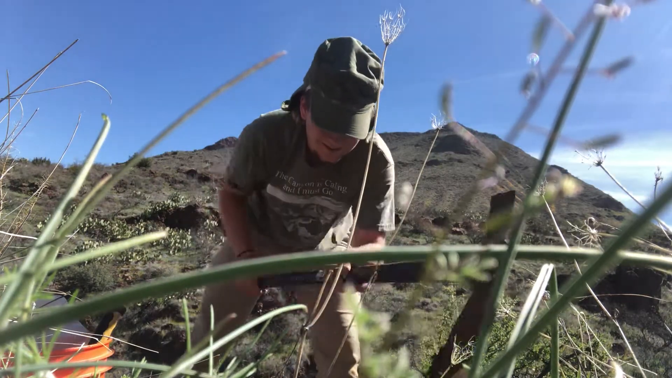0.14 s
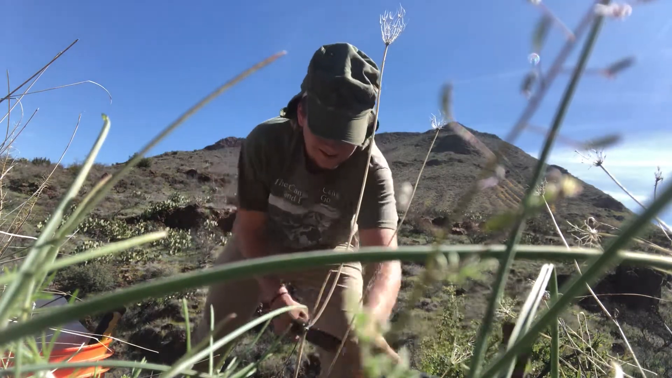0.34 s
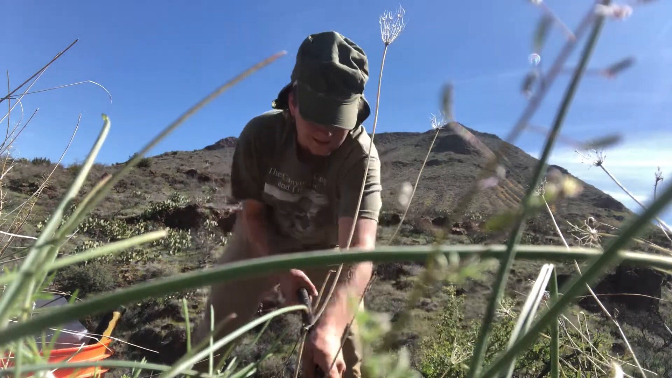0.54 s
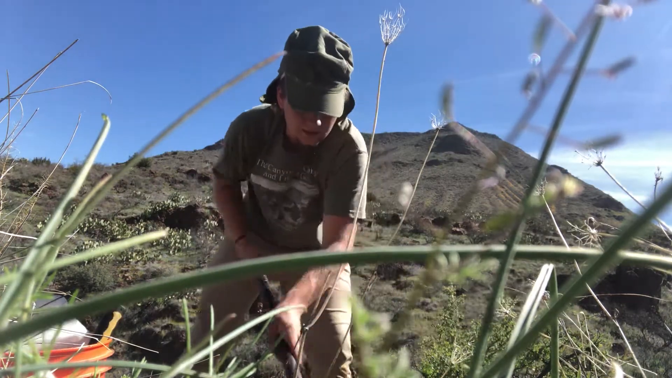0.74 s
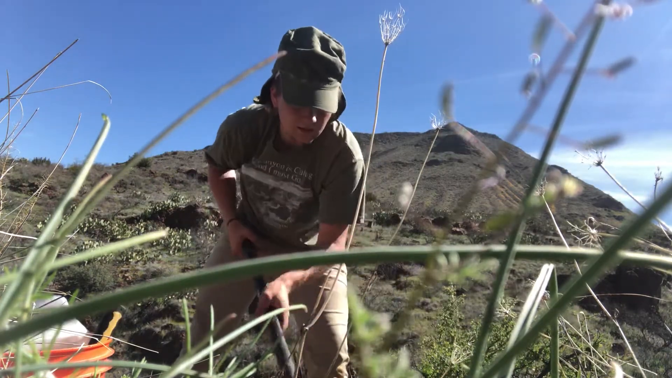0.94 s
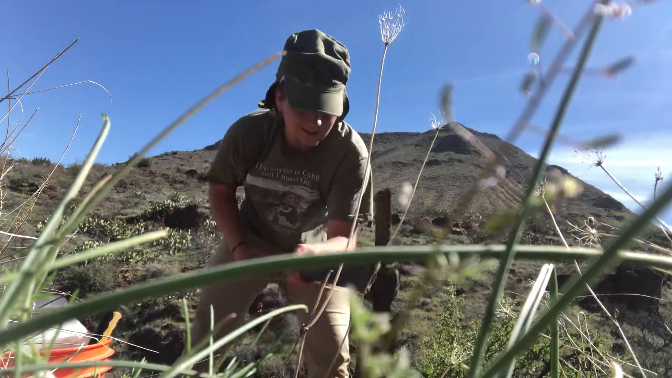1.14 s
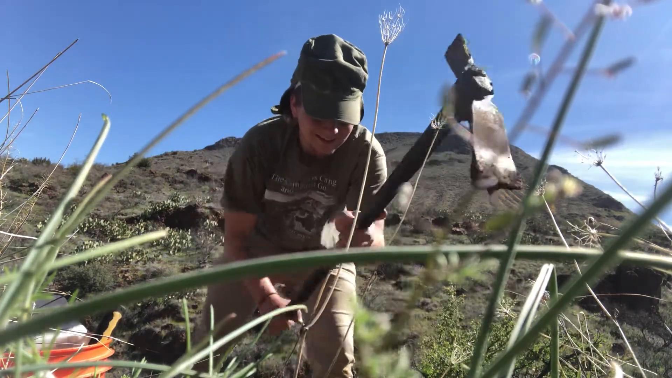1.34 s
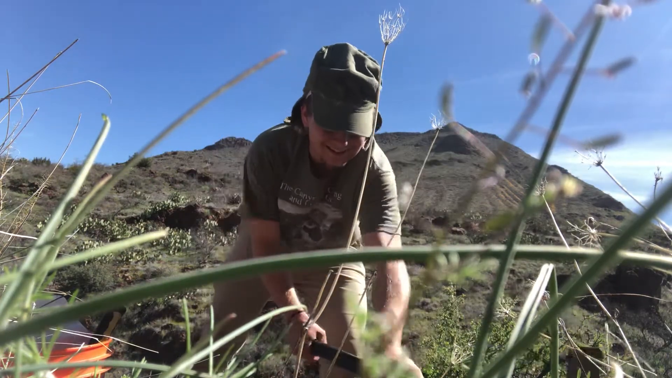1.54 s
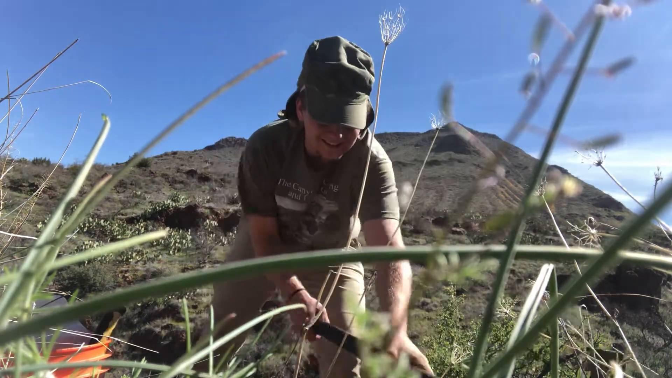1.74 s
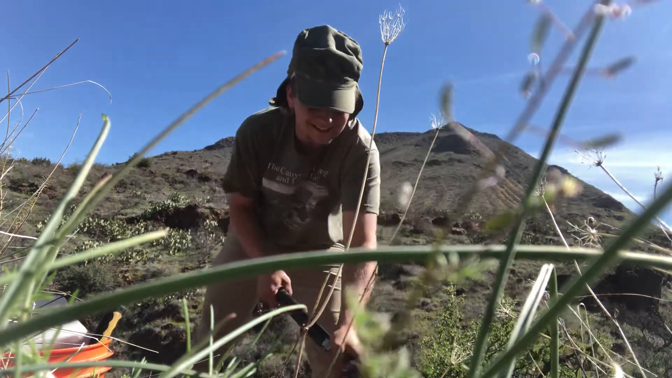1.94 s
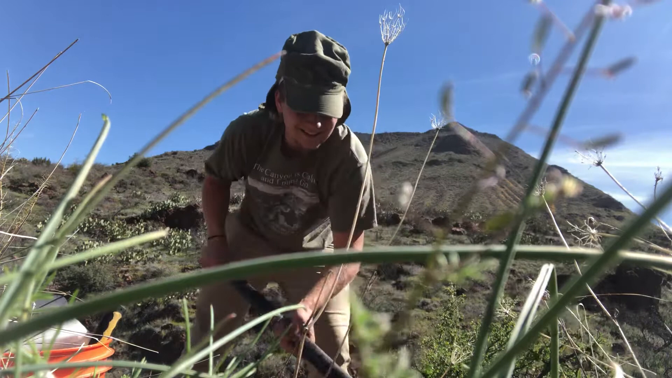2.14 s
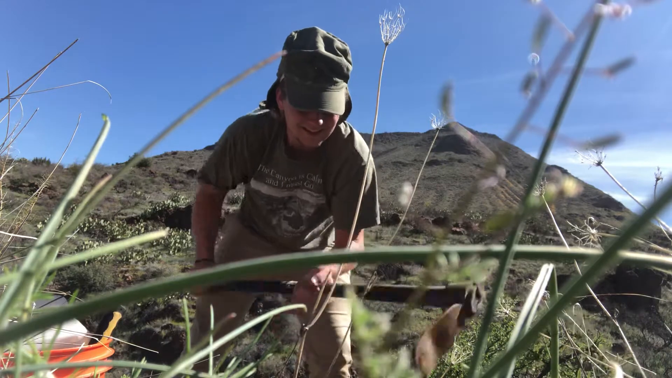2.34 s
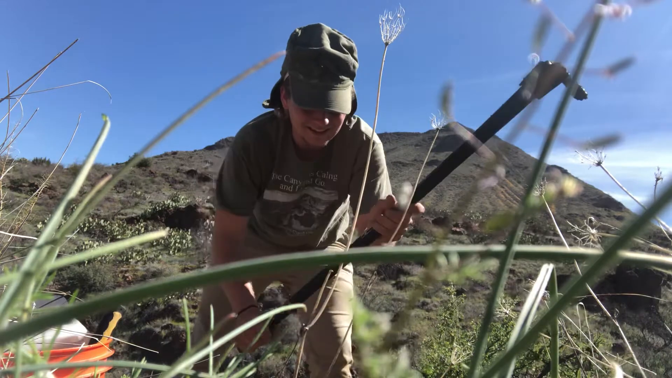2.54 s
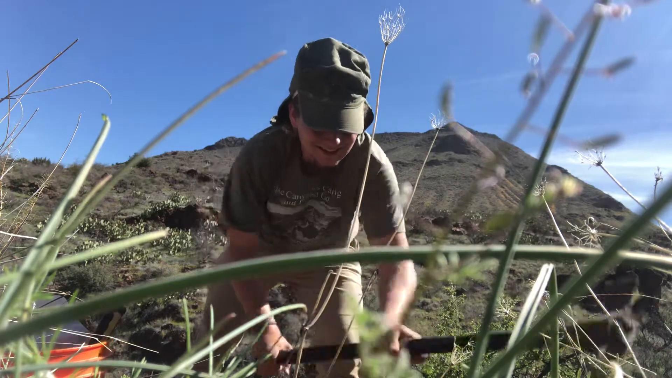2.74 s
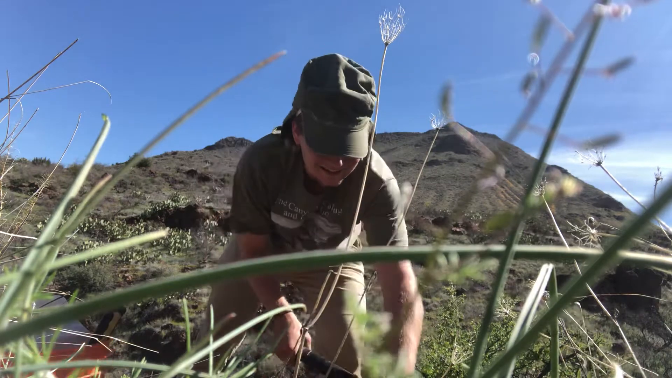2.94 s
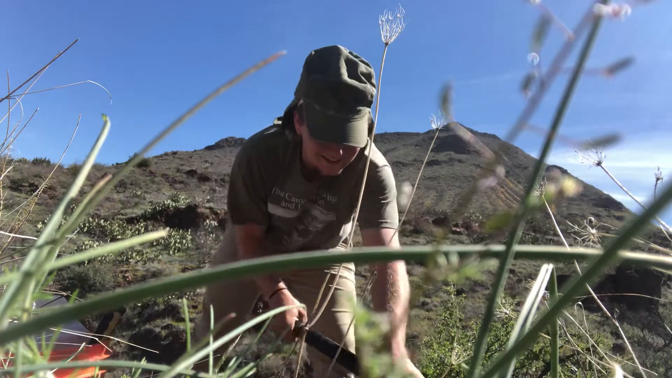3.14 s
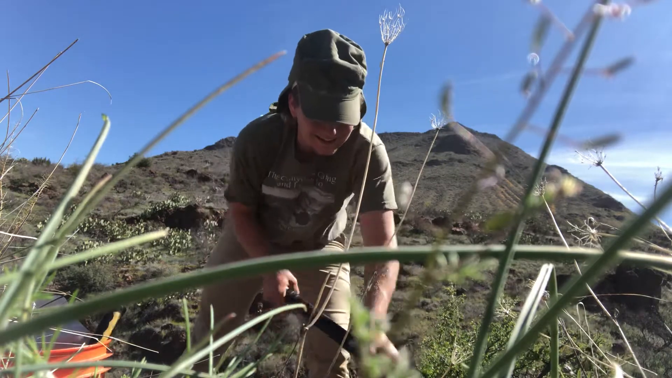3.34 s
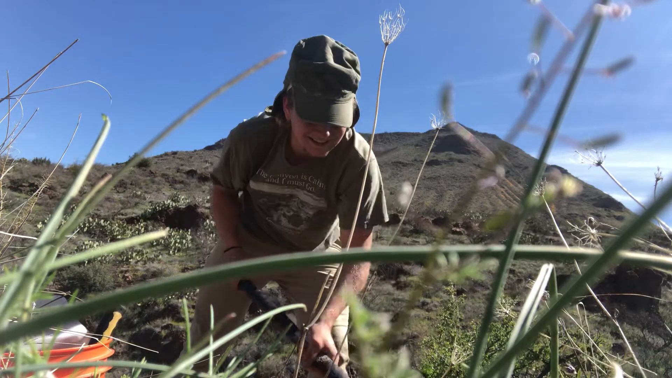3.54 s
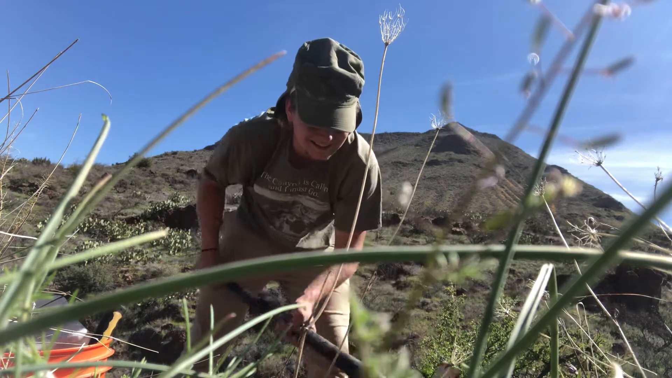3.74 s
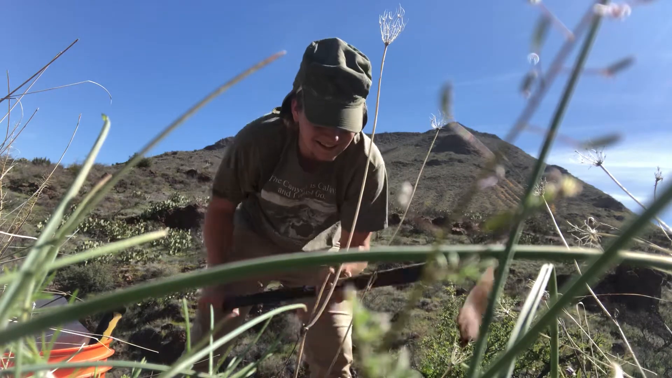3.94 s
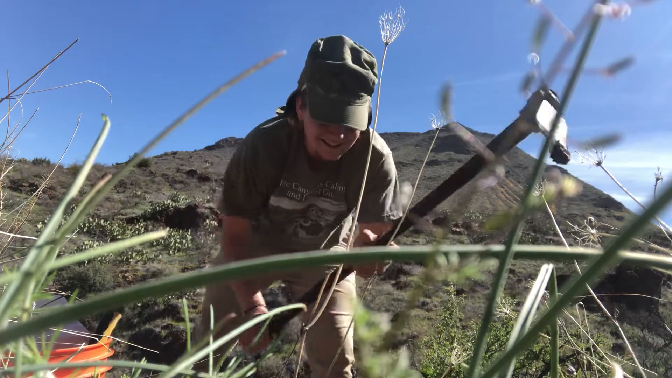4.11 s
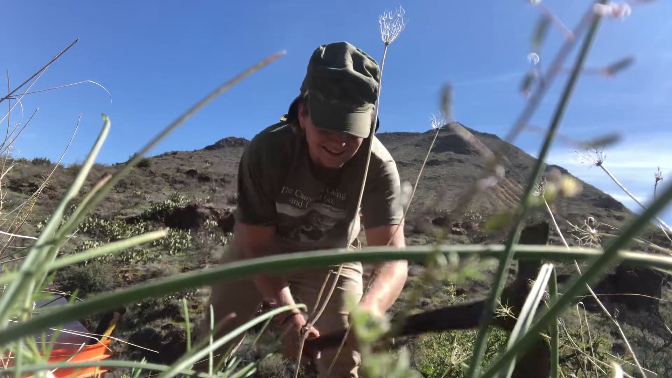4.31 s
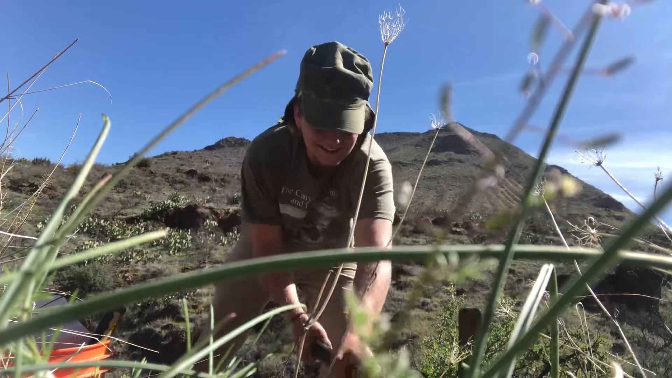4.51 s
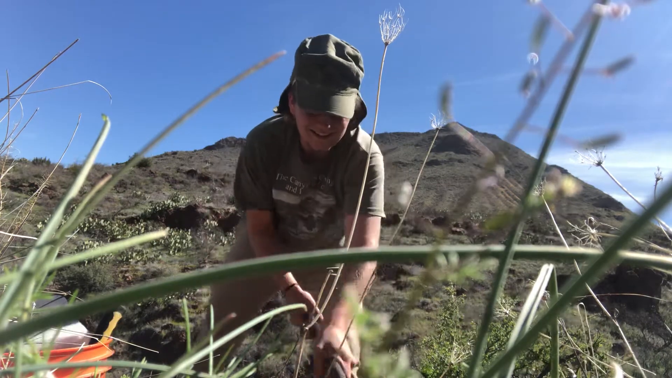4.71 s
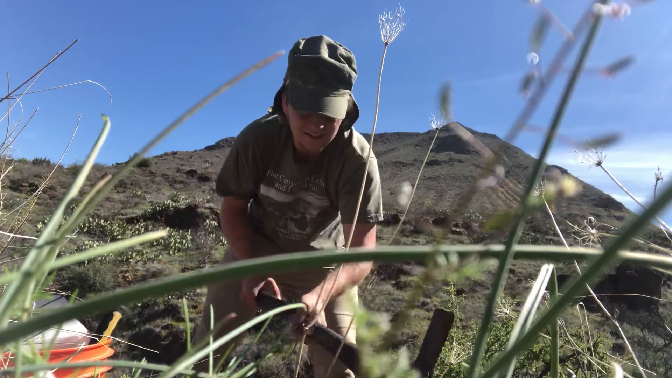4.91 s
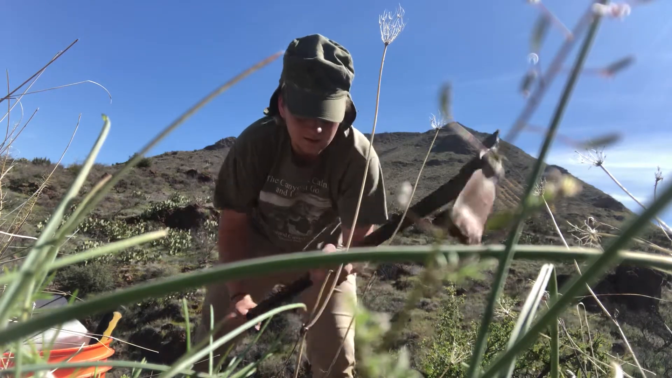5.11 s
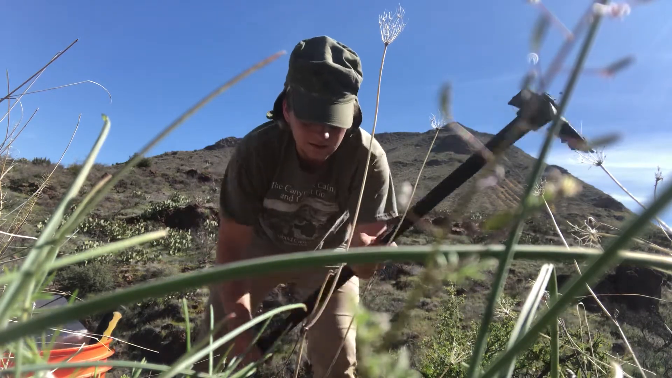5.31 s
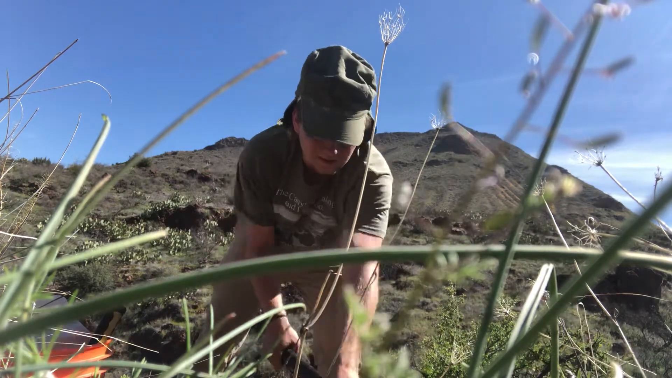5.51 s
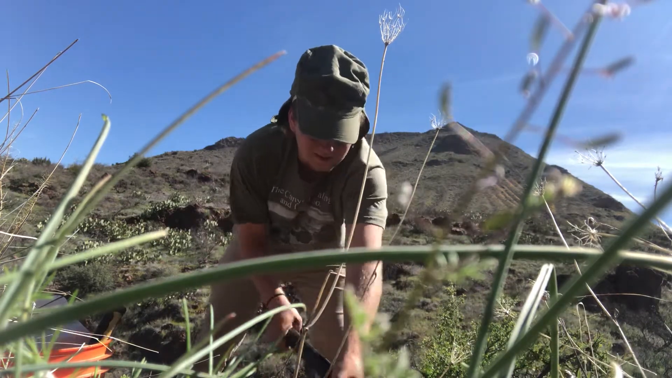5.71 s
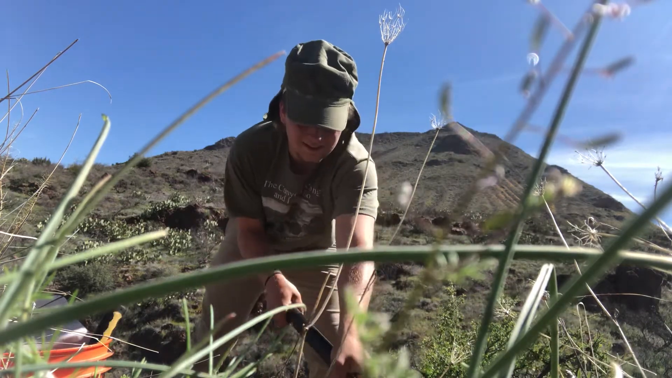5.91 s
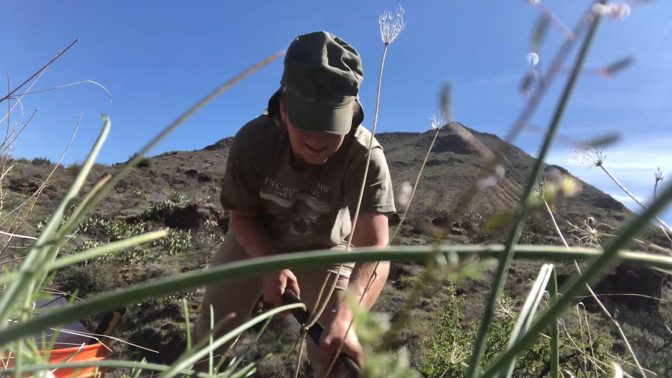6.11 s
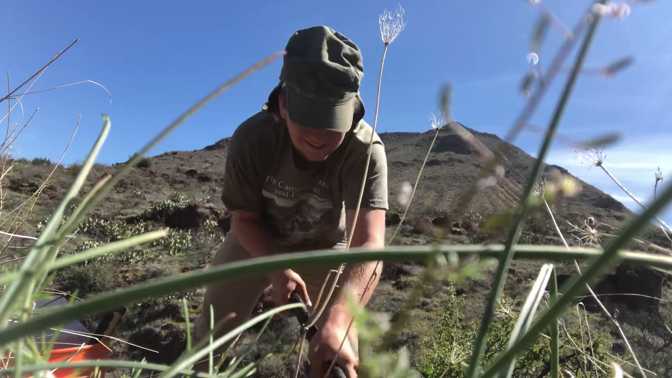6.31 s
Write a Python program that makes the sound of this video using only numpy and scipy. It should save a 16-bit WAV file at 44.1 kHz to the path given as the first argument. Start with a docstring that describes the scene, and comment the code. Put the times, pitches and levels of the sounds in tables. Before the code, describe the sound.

A long-handled pick strikes dry, stony ground five times outdoors, with gritty scrapes, clacking stones and trickling crumbs between blows, and a faint distant bird trill.

```python
"""On an open hillside, a long-handled pick bites five times into dry, rocky ground.
Each blow is a filtered noise crack and crush, a sum of damped stone modes and two slow ground pulses.
Between blows the blade drags through grit: noise grains under a rough force, filtered by soil and steel.
Loose stones clack as decaying tones, and crumbs trickle as tiny noise ticks.
Boots scuff, sleeves rustle, and a far bird trills in gliding sine notes over air of filtered noise."""
import sys
import numpy as np
from scipy import signal
from scipy.fft import rfft, irfft, next_fast_len
from scipy.io import wavfile
from scipy.ndimage import map_coordinates

SR = 44100
rng = np.random.default_rng(int(sys.argv[2]) if len(sys.argv) > 2 else 0)


def put_to_file(sound):
    """Save the sound as 16-bit audio at rate SR, in the file named by the first command-line argument."""
    columns = np.atleast_2d(sound).T  # one column per channel
    safe = np.clip(columns, -1, 1)
    whole_steps = np.round(safe * 32767)
    wavfile.write(sys.argv[1], SR, whole_steps.astype(np.int16))


N = 280476  # samples


def amp(db):
    """Level law: decibels to amplitude gain."""
    return 10 ** (np.asarray(db) / 20)


def unit(x):
    """Power normalisation: scale to rms 1."""
    return x / np.sqrt(np.mean(x ** 2) + 1e-20)


def punch(x):
    """Energy normalisation: scale a short sound to the energy of 5 ms at rms 1."""
    return x / np.sqrt(np.sum(x ** 2) / (0.005 * SR))


def add(track, s, sound):
    """Superposition: mix a sound in at time s."""
    start = max(round(s * SR), 0)
    track[start:start + len(sound)] += sound[:N - start]


def wobble(rate, size=N):
    """Slow random modulation: a smooth curve through rate random knots a second."""
    knots = rng.standard_normal(4096)
    return map_coordinates(knots, [np.arange(size) * rate / SR], mode="wrap")


def colour(x, spectrum):
    """Minimum-phase filtering: a causal filter with the gain of (f/Hz, level/dB) points."""
    size = next_fast_len(len(x) + 4096)
    f, db = np.transpose(spectrum)
    log_f = np.log(np.fft.rfftfreq(size, 1 / SR) + 1)
    gain = amp(np.interp(log_f, np.log(f), db))
    # folding the cepstrum onto positive time makes the filter causal
    cepstrum = irfft(np.log(gain), size)
    cepstrum[1:size // 2] *= 2
    cepstrum[size // 2 + 1:] = 0
    response = np.exp(rfft(cepstrum))
    return irfft(rfft(x, size) * response, size)[:len(x)]


def resonances(x, modes):
    """Modal filtering: parallel damped resonances of (f/Hz, width/Hz, level/dB)."""
    size = next_fast_len(len(x) + 4096)
    f = np.fft.rfftfreq(size, 1 / SR)
    gain = sum(amp(db) * 1j * f * width / (hz ** 2 - f ** 2 + 1j * f * width)
               for hz, width, db in modes)
    return irfft(rfft(x, size) * gain, size)[:len(x)]


def pebbly(x, depth_db, count=56):
    """Irregular modal response: each handful of stones has random resonances of its own."""
    hz = np.geomspace(250, 16000, count)
    return colour(x, np.column_stack([hz, depth_db * rng.standard_normal(count)]))


def grains(size, rate, spread_db):
    """Granular noise: sparse random impacts of uneven size, rate a second on average."""
    hits = rng.random(size) < rate / SR
    return unit(hits * rng.standard_normal(size) * amp(spread_db * rng.random(size)))


def burst(t, rise, t60):
    """Impact envelope: a swell to 1 and an exponential decay."""
    shape = (1 - np.exp(-(t / rise) ** 2)) * amp(-60 * t / t60)
    return shape / shape.max()


def ground(t, hz, swell):
    """Damped oscillation: soil heaves most after swell seconds and swings a few slow cycles."""
    heave = (t / swell * np.exp(1 - t / swell)) ** 3
    return heave * np.sin(2 * np.pi * hz * t)


def stroke(t, length):
    """Friction force: it builds, catches and slips, then lets go while crumbs still move."""
    after = np.maximum(t - length, 0)
    release = amp(-60 * after / (0.0098 + 0.22 * length)) + 0.071 * amp(-60 * after / 0.11)
    shape = (1 - np.exp(-t / (0.001 + 0.05 * length))) * release
    rough = shape * amp(3.9 * wobble(200, size=len(t)))
    return rough * np.linalg.norm(shape) / np.linalg.norm(rough)  # same energy as the smooth shape


# spectrum of the moving air: (f/Hz, level/dB)
AIR = [(15, -42), (25, -16), (82, 0.5), (123, -5), (161, -4), (212, -5), (427, -9), (754, -11.5),
       (988, -14.5), (1700, -22.5), (1840, -21), (7920, -25.5), (16000, -35.5)]


def air():
    """Broadband flow noise: a light breeze over the hillside, its level wavering slightly."""
    high_pass = signal.butter(3, 45, "high", fs=SR, output="sos")
    breeze = signal.sosfilt(high_pass, colour(rng.standard_normal(N), AIR))
    return amp(-65 + 0.3 * wobble(2.5) + 0.64 * wobble(86)) * unit(breeze)


TRILL_START_S, NOTE_GAP_S, GAP_GROWTH_S = 1.625, 0.01384, 0.000015  # growth per note
TRILL_SINK_PER_S = 0.072  # share of its starting pitch that the trill loses each second
# loudness contour of the trill: (t/s, level/dB)
TRILL = [(1.6, -80), (1.75, -63.5), (2.0, -58), (2.2, -57.5), (2.62, -65.5), (2.68, -77.5)]


def bird(high_hz=4990, low_hz=4380, count=72):
    """Frequency modulation: slightly falling high notes alternate with low arches, sinking and slowing."""
    out, u = np.zeros(N), np.linspace(-1, 1, round(0.012 * SR))
    notes = [high_hz - 130 * (u + 0.5) ** 2, low_hz - 400 * u ** 2]
    for k in range(count):
        elapsed = k * (NOTE_GAP_S + GAP_GROWTH_S * k / 2)
        start = TRILL_START_S + elapsed
        db = np.interp(start, *np.transpose(TRILL)) + rng.normal(0, 1.3)
        hz = notes[k % 2] * (1 - TRILL_SINK_PER_S * elapsed + rng.normal(0, 0.0054))
        tone = np.sin(2 * np.pi * np.cumsum(hz) / SR)
        add(out, start, amp(db) * np.cos(np.pi * u / 2) * tone)
    return out


# sleeves rustling as the pick is swung: (t/s, half length/s, level/dB)
SWINGS = [(0.156, 0.098, -66), (1.277, 0.056, -71.5), (1.454, 0.027, -64.5), (4.098, 0.059, -70)]


def sleeves():
    """Fibre friction: cloth brushes softly with the swing, as noise in bell-shaped swells."""
    t = np.arange(N) / SR
    level = sum(amp(db) * np.exp(-((t - s) / half) ** 2) for s, half, db in SWINGS)
    cloth = [(1000, -11), (3500, -4), (5500, 2), (8000, -9), (15000, -12)]  # (f/Hz, level/dB)
    return level * unit(colour(rng.standard_normal(N), cloth))


# boots shifting on the dirt: (t/s, length/s, level/dB)
SCUFFS = [(0.01, 0.032, -46.5), (0.226, 0.077, -53), (0.857, 0.009, -40), (3.485, 0.007, -48.5),
          (3.541, 0.0043, -46), (3.55, 0.007, -41), (5.625, 0.072, -65.5)]
# spectrum of a sole pressing dirt, also used for crumbs: (f/Hz, level per Hz/dB)
SOLE = [(100, -6.5), (400, 9), (1400, -4.5), (2600, -11), (4500, -12.5), (7000, -27.5), (15000, -42)]


def boots():
    """Granular friction: soles crush the dirt in short dull scuffs."""
    out, t = np.zeros(N), np.arange(SR // 4) / SR
    for s, length, db in SCUFFS:
        force = stroke(t, length)
        crushed = force * grains(len(t), rate=4500, spread_db=7.0)
        crunch = pebbly(colour(crushed, SOLE), depth_db=2.5)
        add(out, s, amp(db) * np.sqrt(np.mean(force ** 2)) * unit(crunch))
    return out


BLOW_SPILL_DB, PULL_SPILL_DB = -56.5, -49  # the largest, earliest crumbs
CRUMB_SPREAD_DB, SPILL_FADE_DB = 6.5, 8.5  # range of sizes; how much weaker the last crumbs are
BLOW_SPILL_S, PULL_OVERRUN_S = 0.42, 0.13  # spill after a blow; overrun past the end of a scrape
CRUMBS_PER_S = 36


def trickle():
    """Random impact process: crumbs tumble after blows and during scrapes, ever weaker, as dry ticks."""
    out, t = np.zeros(N), np.arange(SR // 30) / SR
    spills = [(s, BLOW_SPILL_S, BLOW_SPILL_DB) for s, *_ in BLOWS]
    spills += [(s, length + PULL_OVERRUN_S, PULL_SPILL_DB) for s, length, *_ in PULLS]
    for s, length, db in spills:
        for when, size in rng.random((round(CRUMBS_PER_S * length), 2)):  # size 0 is the largest
            impact = burst(t, 0.00028, 0.009) * rng.standard_normal(len(t))
            tick = pebbly(colour(impact, SOLE), depth_db=6)
            level = amp(db - SPILL_FADE_DB * when - CRUMB_SPREAD_DB * size)
            add(out, min(s + when * length, (N - 1) / SR), level * punch(tick))
    return out


# loose stones knocked aside: (t/s, level/dB, f/Hz, t60/s)
KNOCKS = [(0.264, -18.5, 706, 0.0088), (0.418, -31.5, 763, 0.054), (0.477, -21.5, 495, 0.04),
          (.779, -31, 629, 0.013), (.858, -31, 2260, 0.0033), (3.234, -33.5, 940, 0.015),
          (3.379, -22.5, 850, 0.019), (3.402, -3.5, 990, 0.0066), (3.403, -22, 1540, 0.026),
          (3.547, -33.5, 1300, 0.013), (3.56, -29, 190, 0.032), (4.381, -14.5, 245.5, 0.052),
          (4.389, -21.5, 944, 0.028), (4.743, -41, 495, 0.012), (5.69, -46.5, 457, 0.027),
          (5.984, -45, 390, 0.025), (6.088, -26.5, 650, 0.015), (6.308, -40, 223, 0.034)]
# clods and feet landing: (t/s, level/dB)
THUDS = [(0.027, -54.5), (.5, -42.5), (0.551, -43), (0.617, -49.5), (3.555, -50.5), (4.58, -35.5),
         (6.309, -44.5)]
# short metallic clinks: (t/s, level/dB)
CLINKS = [(4.356, -29), (4.585, -33), (4.598, -27), (4.636, -43), (5.49, -42)]
# ringing modes of the blade: (f/Hz, level/dB, t60/s)
STEEL = [(1200, -23, 0.066), (1696, -6, 0.13), (2902, -2, 0.055), (4360, -26, 0.13), (5570, -5, 0.032)]


def loose_stones():
    """Impact-excited decay: stones clack dully, clods and feet thud, and short metallic clinks ring."""
    out, t = np.zeros(N), np.arange(SR // 4) / SR
    for s, db, hz, t60 in KNOCKS:
        rough = unit(colour(rng.standard_normal(len(t)), SOIL))
        clack = np.sin(2 * np.pi * hz * t) + 0.17 * rough
        add(out, s, amp(db) * burst(t, 0.00076, t60) * clack)
    for s, db in THUDS:
        add(out, s, amp(db) * ground(t, hz=68.7, swell=0.03))
    for s, db in CLINKS:
        ring = sum(amp(level) * burst(t, 0.00035, t60) * np.sin(2 * np.pi * hz * t)
                   for hz, level, t60 in STEEL)
        add(out, s, amp(db) * ring)
    return out


def gravel(force, count=3):
    """Incoherent summation: stones grind at once, each in its own colour, taking turns to be loudest."""
    size, total = len(force), 0
    for _ in range(count):
        pressure = force * amp(4 * wobble(110, size=size))
        total = total + unit(pebbly(pressure * grains(size, rate=1100, spread_db=8), depth_db=3.5))
    return total


# spectrum of sliding soil: (f/Hz, level per Hz/dB)
SOIL = [(50, -9), (150, -2), (300, -1), (550, 0), (1100, -0.5), (1800, -8.5), (2600, -17.5), (5000, -38.5),
        (15000, -67)]
# spectrum of grit: (f/Hz, level per Hz/dB)
GRIT = [(800, -26.5), (2000, -2.5), (3000, 6.5), (4500, 7), (6000, -0.5), (7800, -3), (8700, -13),
        (10000, -6.5), (11500, -18.5), (14000, -18.5), (16000, -32.5)]
# bright resonances of the blade pressed into the soil: (f/Hz, width/Hz, level/dB)
BLADE = [(1236, 62, 1), (1690, 35, 1.5), (2160, 130, -6.5), (2976, 39, 2), (3400, 96, -1.5), (4430, 160, 1),
         (5377, 73, 2), (5790, 160, -5), (6930, 83, -6), (7460, 69, -3), (9320, 190, -8.5),
         (11700, 67, -18.5), (11500, 430, -18), (14400, 400, -26)]


def slide(force, soil_db, grit_db, steel_db=-1, sand_db=-3):
    """Friction-driven resonance: steel grinds soil and snaps grit, which sets the blade singing."""
    grinding = gravel(force)
    soil = colour(grinding, SOIL)
    snaps = force * grains(len(force), rate=6200, spread_db=5.5)
    sand = unit(colour(grinding, GRIT))
    steel = unit(pebbly(resonances(snaps, BLADE), depth_db=3))
    grit = amp(sand_db) * sand + amp(steel_db) * steel
    level = np.sqrt(np.mean(force ** 2)) * amp(soil_db)
    return level * (unit(soil) + amp(grit_db) * unit(grit))


SLIP_KNOTS_PER_S, SLIP_DB = 44, 4  # a scrape sticks and slips: how fast, how deeply
CATCH_S = 0.0054  # how long the edge holds
# pulls of the blade through the dirt, and a brief faint scrape just before the fourth blow:
# (t/s, length/s, soil level/dB, swell over the length/dB, grit re soil/dB)
PULLS = [(0.433, 0.041, -34, 3.5, -7.5), (0.527, 0.024, -42.5, 20, -1.5), (.608, 0.013, -32, 0, -14),
         (0.673, 0.16, -55, -2.5, -4), (1.746, 0.16, -49.5, -3.5, -3.5), (1.934, 0.11, -53, 7, 2.5),
         (2.068, 0.038, -73, -6, 13), (3.123, 0.22, -47, 3, -7), (3.321, 0.047, -45.5, 13.5, -2.5),
         (3.4, .018, -26, 4, -8), (4.343, .022, -43.5, 5, -4), (4.523, .077, -38, 14, -2),
         (4.629, 0.012, -44, 1, -1), (4.663, 0.039, -51, -9, 0), (6.013, 0.047, -48.5, 3, -6),
         (6.06, 0.026, -34, -2, -8), (6.114, 0.028, -54.5, 4, -3.5), (6.162, .09, -47.5, -17, -8.5)]
# the edge catches on a buried stone and jerks free: (t/s, soil level/dB, grit re soil/dB)
CATCHES = [(.493, -28.5, -4), (.595, -31.5, -11.5), (.734, -38, -3.5), (1.866, -34.5, -9),
           (1.952, -41, 1.5), (3.118, -39.5, -7), (3.374, -23.5, -11.5), (4.583, -31, -17),
           (4.679, -33.5, -9.5), (6.019, -50.5, 8.5)]


def scrapes():
    """Stick-slip friction: scrapes through dirt swell or fade, with short jerks at buried stones."""
    out, t = np.zeros(N), np.arange(round(0.35 * SR)) / SR
    for s, length, soil_db, swell_db, grit_db in PULLS:
        heap_db = swell_db * (np.minimum(t / length, 1) - 0.5)
        steady = stroke(t, length) * amp(heap_db)
        force = steady * amp(SLIP_DB * wobble(SLIP_KNOTS_PER_S, size=len(t)))
        force = force * np.linalg.norm(steady) / np.linalg.norm(force)  # slipping keeps the energy
        add(out, s, slide(force, soil_db, grit_db))
    for s, soil_db, grit_db in CATCHES:
        add(out, s, slide(stroke(t, CATCH_S), soil_db, grit_db))
    return out


HISS_DB, HISS_T60_S = -45, 0.16  # hiss level is relative to the splintering
# blows: (t/s, crack level/dB, crushed soil level/dB, stone level/dB, ground thump level/dB,
#         dull push level/dB, crush t60/s, lift of the crack's top octave/dB)
BLOWS = [(0.3656, -14.5, -19, -11.5, -24, -23.5, 0.049, -3.5), (1.5461, -18, -17, -22, -26, -24, 0.044, -5),
         (2.794, -15.5, -13, -10, -23.5, -24, 0.06, 4.5), (4.3663, -15, -13, -11.5, -20, -17.5, 0.064, 3.5),
         (5.5001, -14, -10, -11.5, -25.5, -26.5, 0.038, -3)]
# the stone met by each blow, damped by the soil round it: lists of (f/Hz, width/Hz, level/dB)
STONES = [
    [(303, 87, 3.5), (417, 180, 4), (3100, 250, -16.5), (7340, 300, -13.5), (820, 110, -1.5),
     (1650, 97, -23.5), (2520, 150, -15), (3660, 250, -14), (4410, 130, -16)],
    [(248, 85, -5.5), (618, 77, -3), (1177, 150, -5), (1700, 55, -12), (2455, 49, -10.5),
     (3960, 100, -11.5), (4325, 157, -13)],
    [(270, 150, -7), (495, 93, -3), (784, 200, 4.5), (1254, 61, -6), (1508, 98, -1.5), (2310, 68, -9.5),
     (4500, 260, -23.5)],
    [(238, 110, -8.5), (887, 320, -3), (1219, 140, 3), (1566, 140, 1), (2070, 120, -2.5), (2367, 82, -3),
     (3130, 68, -3.5), (4330, 210, -12)],
    [(310, 27, 2), (487.5, 150, 12.5), (780, 72, 1), (958, 24, 3), (1350, 87, -5.5), (2550, 100, -11.5),
     (3393, 140, -5), (4745, 400, -14.5)],
]
# spectrum of splitting stone: (f/Hz, level per Hz/dB)
CRACK = [(300, -28.5), (1200, 3), (2300, 2.5), (2800, -9), (3600, 4), (5200, 2.5), (6500, -3), (7700, -2),
         (8700, -14.5), (10200, -6.5), (13000, -16.5), (16000, -22.5)]
# spectrum of crushed ground: (f/Hz, level per Hz/dB)
CRUSH = [(40, -23.5), (120, -7), (300, 4.5), (800, 2), (1400, -5), (2200, -16), (4000, -27), (10000, -41)]


def blows():
    """Impact excitation: the tip cracks on a stone and drives it into the ground."""
    out, t = np.zeros(N), np.arange(SR // 4) / SR
    for blow, modes in zip(BLOWS, STONES):
        s, crack_db, crush_db, stone_db, thump_db, push_db, t60, top_db = blow
        crack_noise, crush_noise, lead_in_noise = rng.standard_normal((3, len(t)))
        # a very short hiss rises into each blow
        lead_in = amp(-60 * t / 0.022) * unit(colour(lead_in_noise, GRIT))
        add(out, s + 0.00066 - len(t) / SR, amp(crack_db - 14.5) * lead_in[::-1])
        # the lift grows over the octave above 6 kHz and then stays
        spectrum = [(hz, db + top_db * np.clip(np.log2(hz / 6000), 0, 1)) for hz, db in CRACK]
        splinter = burst(t, 0.0018, 0.01) + amp(-21.0) * burst(t, 0.0046, 0.021)
        # a faint hiss fades after each crack
        hiss = amp(HISS_DB) * burst(t, 0.03, HISS_T60_S)
        add(out, s, amp(crack_db) * punch(colour(crack_noise * (splinter + hiss), spectrum)))
        crushed = colour(crush_noise * burst(t, 0.0013, t60), CRUSH)
        add(out, s, amp(crush_db) * punch(crushed))
        ring = np.zeros(len(t))
        for hz, width, db in modes:
            decay = np.sqrt(width) * np.exp(-np.pi * width * t)
            ring += amp(db) * decay * np.sin(2 * np.pi * (hz * t + rng.random()))
        add(out, s + 0.001, amp(stone_db) * punch(ring * burst(t, 0.0016, 0.19)))
        add(out, s + 0.013, amp(thump_db) * ground(t, hz=61.4, swell=0.021))
        add(out, s + 0.0037, amp(push_db) * ground(t, hz=137.5, swell=0.009))
    return out


def scene():
    """Free-field superposition: everything sounds in the open, without echo."""
    digging = blows() + scrapes() + boots() + loose_stones() + trickle()
    background = sleeves() + bird() + air()
    return (digging + background)[None]


TOP_HZ = 15900  # band limit of the microphone


def record(dry):
    """Band limiting and soft saturation: the microphone sheds deep rumble, rounds peaks and cuts the top."""
    high_pass = signal.butter(2, 32, "high", fs=SR, output="sos")
    lean = signal.sosfiltfilt(high_pass, dry)
    rounded = lean / (1 + np.abs(lean / 0.85) ** 6) ** (1 / 6)
    low_pass = signal.ellip(10, 0.1, 90, TOP_HZ, fs=SR, output="sos")
    return signal.sosfilt(low_pass, rounded)


dry = scene()
out = record(dry)
put_to_file(out)
```